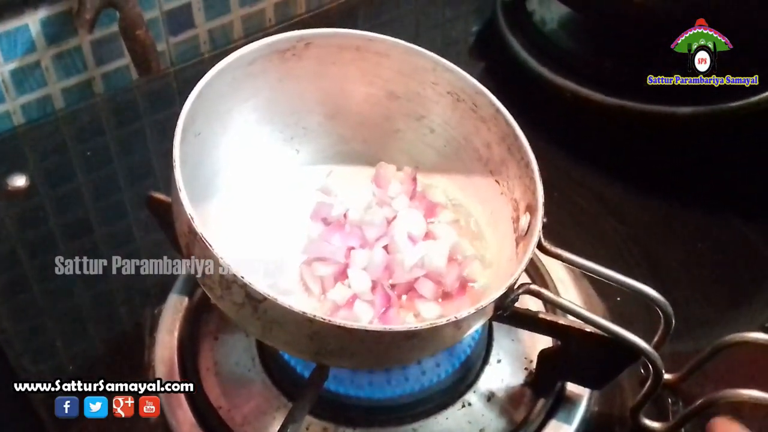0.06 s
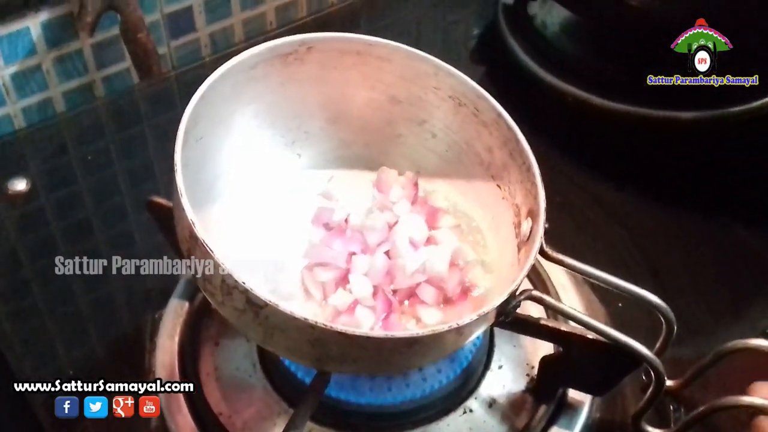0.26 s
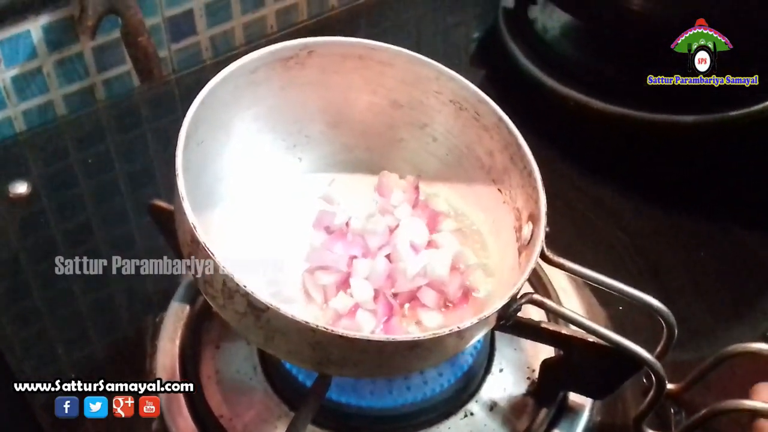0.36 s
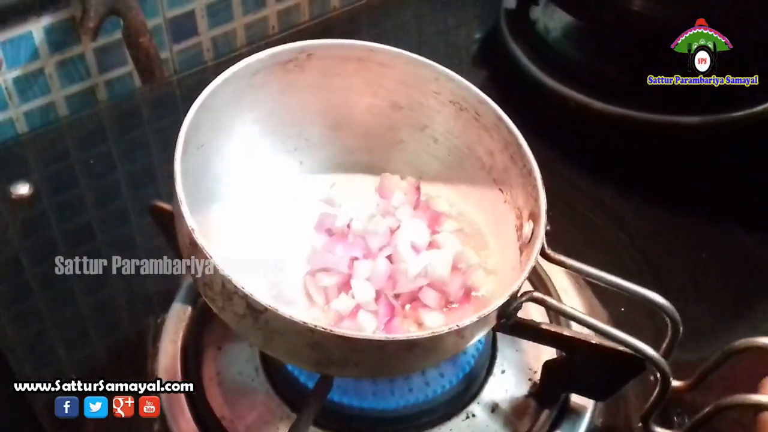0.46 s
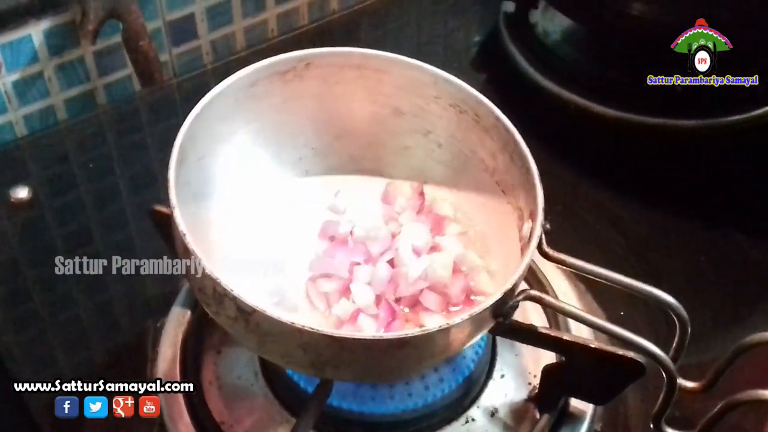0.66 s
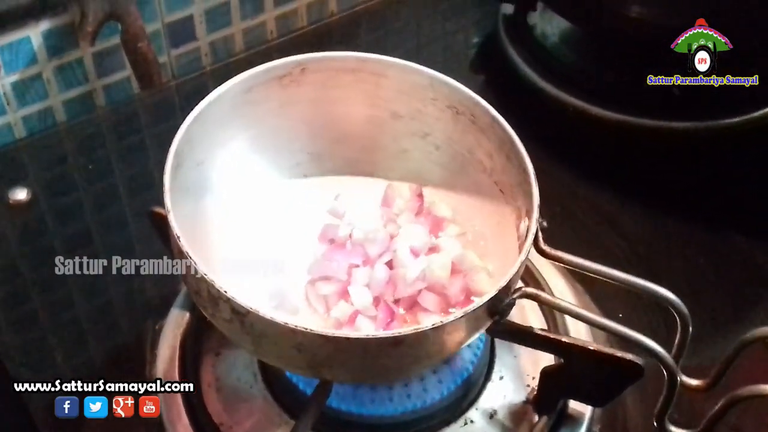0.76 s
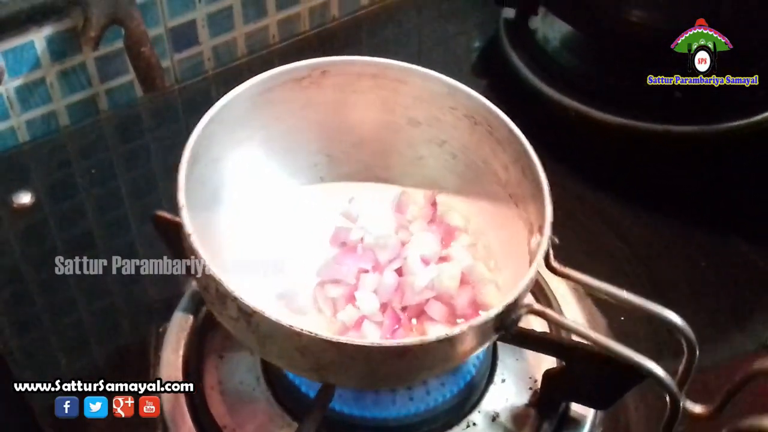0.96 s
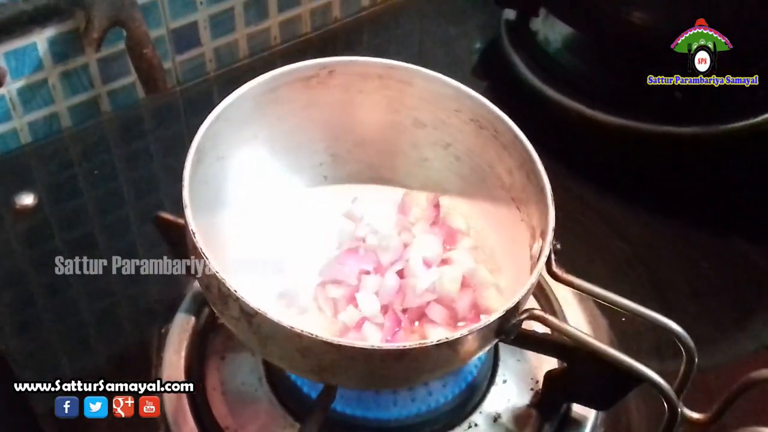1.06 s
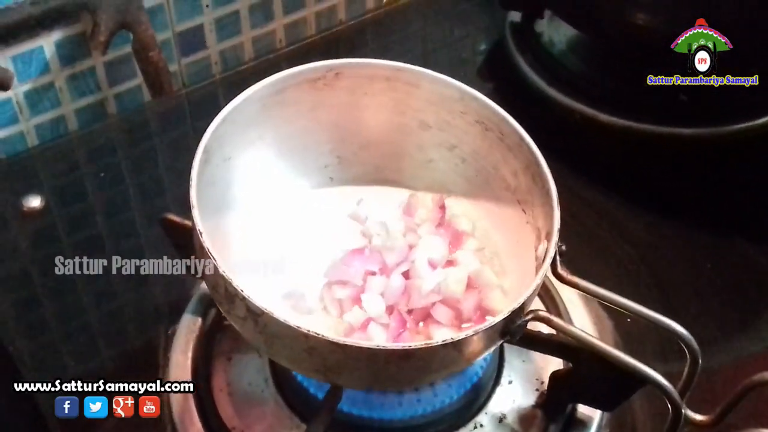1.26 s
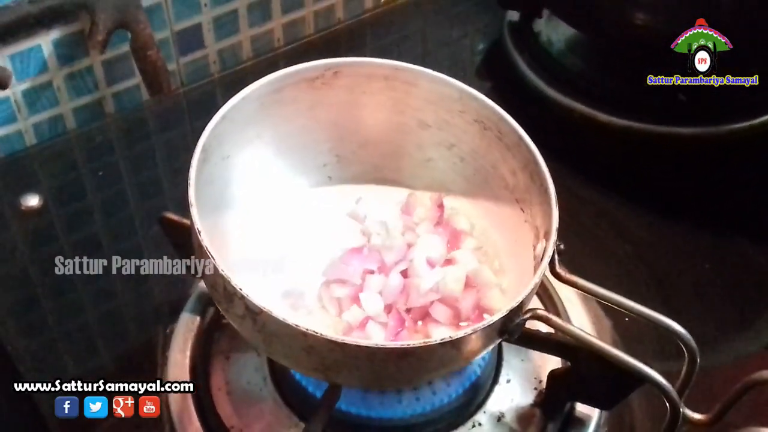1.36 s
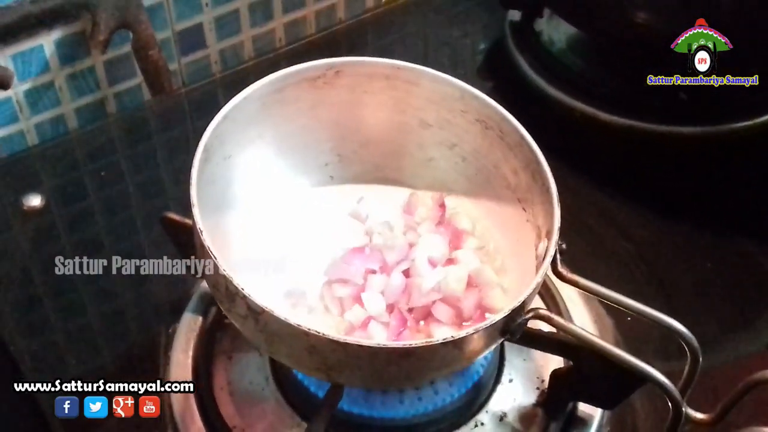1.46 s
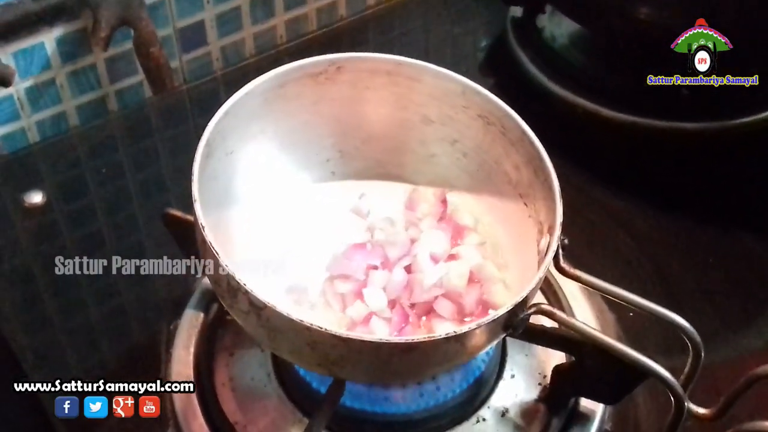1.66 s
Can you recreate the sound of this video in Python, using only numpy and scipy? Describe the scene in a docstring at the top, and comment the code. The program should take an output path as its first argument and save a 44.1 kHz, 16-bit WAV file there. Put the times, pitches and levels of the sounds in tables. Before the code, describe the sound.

Chopped shallots sizzle steadily in a deep metal pan over a gas flame, with small spits throughout; early on a metal utensil clatters down nearby, later soft bumps and a sharp pop, heard close in a small kitchen.

```python
"""In a small kitchen, chopped shallots sizzle gently in oil in a deep metal pan over a gas flame.
Tiny bubbles burst all the time as snaps with brief tones; larger ones spit, echoing between the pan's walls.
Nearby a metal utensil is put down: dense clacks and ringing modes, then narrow tones as it settles.
Later come soft bumps of dull noise and one sharp pop, a crack with a very short ring."""
import sys
import numpy as np
from scipy import signal
from scipy.fft import rfft, irfft
from scipy.io import wavfile

SR = 44100
rng = np.random.default_rng(int(sys.argv[2]) if len(sys.argv) > 2 else 0)


def unload_wav(signal):
    """Save mono or channel-first audio to the path in sys.argv[1] as 16-bit WAV at rate SR, clipped to [-1, 1]."""
    wavfile.write(
        sys.argv[1],
        SR,
        np.round(np.clip(np.atleast_2d(signal).T, -1, 1) * 32767).astype(np.int16),
    )


N = 74970
T = np.arange(N) / SR  # time in seconds


def from_db(db):
    """Decibels to gain."""
    return 10 ** (np.asarray(db) / 20)


def rms_one(x):
    """Scale to rms 1."""
    return x / np.sqrt(np.mean(x ** 2) + 1e-20)


def through(x, response):
    """Pass a sound through an impulse response."""
    return signal.fftconvolve(x, response)[:N]


def delayed(x, s):
    """Start a sound s seconds later."""
    return np.concatenate([np.zeros(int(s * SR)), x])[:N]


def dying(t60):
    """Exponential decay from 1, falling 60 dB in t60 seconds."""
    return from_db(-60 * np.minimum(T / t60, 5))


def ring(modes):
    """Sum of damped sines."""
    return sum(from_db(db) * dying(t60) * np.sin(2 * np.pi * hz * T) for hz, db, t60 in modes)


def low_cut(x, hz):
    """Small objects radiate little bass."""
    return signal.sosfilt(signal.butter(2, hz, "high", fs=SR, output="sos"), x)


def colour(points, tilt_db=0, size=4096):
    """Causal (minimum-phase) response of unit energy with a given spectrum, tilted in dB per octave."""
    hz, db = np.transpose(points)
    octave = np.log2(np.maximum(np.fft.rfftfreq(size, 1 / SR), 1))
    gain = from_db(np.interp(octave, np.log2(hz), db + tilt_db * np.log2(hz)))
    # folding the cepstrum onto positive times makes the response causal
    cepstrum = irfft(np.log(gain / gain.max()))
    cepstrum[1:size // 2] *= 2
    cepstrum[size // 2 + 1:] = 0
    response = irfft(np.exp(rfft(cepstrum)))
    return response / np.linalg.norm(response)


def echoes(delay_s, t60, db):
    """Direct sound followed by dense dying reflections, their energy in dB relative to the direct sound."""
    tail = delayed(rng.standard_normal(N) * dying(t60), delay_s)
    tail *= from_db(db) / np.linalg.norm(tail)
    tail[0] += 1
    return tail


def random_clicks(per_s, spread_db):
    """Clicks of either sign at random moments: many small, a few large."""
    signs = rng.choice([-1, 1], N)
    sizes = from_db(spread_db * np.minimum(rng.exponential(1, N), 4)) * signs
    happens = rng.random(N) < per_s / SR
    return sizes * happens


def kitchen(x, db):
    """Add the reverberation of the small room, as dense echoes."""
    return through(x, echoes(delay_s=0.006, t60=0.43, db=db))


# colour of the faint hiss that differs between the ears [f/Hz, level/dB]
SIDE_COLOUR = [(20, 5), (60, -19), (140, 0), (300, -2), (1000, 3.5), (2500, -18.5), (5000, -25.5),
               (7000, -7), (10000, -22.5), (13000, -11), (15500, -31)]
SIDE_DB = -78.5


def side_hiss():
    """Steady coloured noise for the difference between the ears."""
    return from_db(SIDE_DB) * through(rng.standard_normal(N), colour(SIDE_COLOUR))


# colour of the gas flame [f/Hz, level/dB]
FLAME_COLOUR = [(20, 8.5), (45, -9.5), (80, 3.5), (140, 5), (210, -5.5), (290, 7.5), (500, -3.5), (1000, 9),
                (3000, -19)]
FLAME_DB = -63.5


def flame():
    """The burning gas makes a steady coloured noise."""
    return from_db(FLAME_DB) * through(rng.standard_normal(N), colour(FLAME_COLOUR))


# soft bumps [t/s, level/dB, t60/s]
BUMPS = [(0.677, -59.5, 0.59), (1.093, -40.5, 0.17), (1.102, -39, 0.19), (1.124, -51, 0.077)]
# colour of a bump [f/Hz, level/dB]
BUMP_COLOUR = [(100, -18), (220, -19), (265, 3.5), (400, -1), (700, 0.5), (1100, 4), (1500, 2),
               (4000, -4.5), (8000, -47), (15000, -52)]


def bumps():
    """Something is nudged on the counter: dull, dense knocks of dying noise."""
    knocks = sum(delayed(from_db(db) * rng.standard_normal(N) * dying(t60), s) for s, db, t60 in BUMPS)
    return through(knocks, colour(BUMP_COLOUR))


# narrow tones of the utensil as it rubs
# [f/Hz, rms level at the loudest/dB, width/Hz, loudest at t/s, spread/s]
SINGING = [(745, -40, 44, .448, 0.011), (762, -52, 69.5, 0.487, 0.025), (3544, -43.5, 14, 0.412, 0.029),
           (2933, -50.5, 31, 0.44, 0.056), (613.5, -45, 82, .395, .015)]
SINGING_LOW_CUT_HZ = 350


def singing():
    """Narrow resonances swell and fade as the utensil slides to rest; a wandering phase widens each."""
    out = np.zeros(N)
    for hz, db, width_hz, s, spread_s in SINGING:
        wander = np.cumsum(rng.standard_normal(N)) * np.sqrt(2 * np.pi * width_hz / SR)
        swell = np.exp(-0.5 * ((T - s) / spread_s) ** 2)
        tone = np.sqrt(2) * np.sin(2 * np.pi * hz * T + wander)
        out += from_db(db) * swell * tone
    return low_cut(out, SINGING_LOW_CUT_HZ)


# modes of the utensil [f/Hz, level/dB, t60/s]
UTENSIL_MODES = [(562.5, -20.5, 0.23), (785, -19, .36), (895, -24, .2), (1047, -22, 0.14),
                 (1262, -18.5, 0.34), (1723, -3, 0.04), (2126, -15.5, 0.15), (2248, -1.5, 0.17),
                 (2400, -31, 0.37), (2818, -18, 0.069), (3824, -26, 0.054), (4794, -7, 0.05),
                 (5026, -11, 0.047), (5780, -14, 0.04)]
RING_ATTACK_HZ = 400  # how fast a mode takes up a blow
REST_S, REST_DAMP_DB, REST_DAMP_S = 0.33, -18, 0.0063  # lying flat damps the metal
# contacts of the utensil [t/s, clack level/dB, ring level/dB, brightness/(dB per octave)]
CONTACTS = [(0.2643, -25.5, -23, 0.5), (0.2752, -28, -36, 7.5), (0.295, -33.5, -48, 4.5),
            (0.3013, -29.5, -47, 1.5), (0.3062, -29, -43, 0.5), (0.312, -32, -30, 3),
            (0.3205, -61, -50, 14), (0.326, -41, -27, -2.5), (0.346, -35, -65, 0.5), (0.383, -41, -27, 2.5),
            (0.396, -33, -50, 2.5), (0.436, -46, -62, 8)]
# colour of a contact [f/Hz, level/dB]
CLACK_COLOUR = [(100, -35), (215, -19.5), (265, 3.5), (430, -2), (580, 3.5), (820, 2.5), (1080, 4),
                (1300, -3.5), (1450, -9), (1750, -2.5), (2300, 4.5), (2630, -8.5), (2870, 2.5), (3150, -9),
                (3800, -3), (5000, -10.5), (6300, -22), (9500, -45), (15000, -54)]
CLACK_T60_S = 0.087


def clatter():
    """Each contact gives a dense clack and tops up the energy of the metal's modes, until it lies flat."""
    clacks, rings = 0, 0
    for s, clack_db, _, tilt_db in CONTACTS:
        clack = through(rng.standard_normal(N) * dying(CLACK_T60_S), colour(CLACK_COLOUR, tilt_db))
        clacks = clacks + delayed(from_db(clack_db) * clack, s)
    attack = signal.butter(2, RING_ATTACK_HZ, fs=SR, output="sos")
    for hz, db, t60 in UTENSIL_MODES:
        fading = dying(t60) ** 2  # energy is amplitude squared
        energy = sum(delayed(from_db(2 * ring_db) * fading, s) for s, _, ring_db, _ in CONTACTS)
        swing = signal.sosfilt(attack, np.sqrt(energy) + 1e-18)
        rings = rings + from_db(db) * swing * np.sin(2 * np.pi * (hz * T + rng.random()))
    rest_damping = from_db(REST_DAMP_DB * np.clip((T - REST_S) / REST_DAMP_S, 0, 1))
    return clacks + rings * rest_damping


LANDING_DB, LANDING_T60_S, LANDING_TILT_DB = -23, 0.036, -0.5  # tilt in dB per octave


def landing():
    """The utensil's first touch adds a short, hard crack."""
    crack = through(rng.standard_normal(N) * dying(LANDING_T60_S), colour(CLACK_COLOUR, LANDING_TILT_DB))
    first_touch_s = CONTACTS[0][0]
    return delayed(from_db(LANDING_DB) * crack, first_touch_s)


PAN_ECHO_S, PAN_ECHO_T60_S = 0.001101, 0.018


def pan_echoes(db):
    """A burst bounces between the pan's walls as a quick dense tail."""
    return echoes(PAN_ECHO_S, PAN_ECHO_T60_S, db)


# short ring of the sharp pop [f/Hz, level/dB, t60/s]
POP_MODES = [(1150, -37, 0.015), (2190, -5.5, 0.025), (2400, 3, 0.015), (3960, 0, 0.017)]
POP_S, POP_RING_DB, POP_CRACK_DB, POP_ECHO_DB = 1.1121, -20.5, -16, -4
POP_TILT_DB = 7.5  # per octave
OIL_LOW_CUT_HZ = 920  # for the pop and the spits


def pop():
    """A drop of water explodes in the oil: a crack and a very short ring."""
    crack = through(pan_echoes(POP_ECHO_DB), colour(SIZZLE_COLOUR, POP_TILT_DB))
    burst = from_db(POP_CRACK_DB) * crack + from_db(POP_RING_DB) * ring(POP_MODES)
    return delayed(low_cut(burst, OIL_LOW_CUT_HZ), POP_S)


# spits of oil [t/s, snap level/dB, snap brightness/(dB per octave), tone level/dB, tone f/Hz]
SPITS = [(0.0712, -32, 6, -52, 3770), (0.145, -36, 3, -41, 3550), (0.2316, -27, 2.5, -33.5, 4230),
         (0.241, -27.5, 4.5, -31.5, 2360), (0.5318, -31.5, 1, -36.5, 2460), (0.576, -35, 5, -36, 3600),
         (0.597, -36, 3, -31, 3930), (0.628, -32, 5, -36, 3950), (0.639, -31, 4, -33.5, 3600),
         (0.647, -30, 4.5, -36, 3700), (0.724, -38, -1, -35, 4400), (0.785, -29, 0, -41, 2400),
         (0.809, -28.5, 2.5, -43, 3900), (0.8638, -37, 0, -32, 4060), (0.8723, -30.5, 3.5, -39, 3020),
         (0.905, -34, 3.5, -51, 3660), (0.933, -38, 1, -41, 3350), (0.9484, -40, 2, -36.5, 4670),
         (0.9798, -28.5, -0.5, -34, 2550), (0.983, -30.5, 1.5, -32.5, 3830), (1.1341, -29, 1, -37, 2200),
         (1.1445, -35, 6.5, -44, 3630), (1.175, -31.5, 5, -32.5, 2560), (1.2513, -28, 0, -51, 3570),
         (1.2645, -26, 4, -40, 3700), (1.295, -35, 8, -44, 4700), (1.3173, -29, 7.5, -24.5, 4460),
         (1.3264, -29, -2, -33.5, 2980), (1.4015, -27, 4, -43, 4250), (1.411, -31.5, 0.5, -32.5, 2450),
         (1.4255, -31, 3.5, -36, 2500), (1.481, -44, 8, -39.5, 7700), (1.4955, -37, 12, -50, 4000),
         (1.57, -44, 9, -39, 6450)]
SPIT_CYCLES, SPIT_ECHO_DB = 25, -2  # the tone falls 60 dB in this many cycles


def spits():
    """Larger bubbles burst: a snap and a few cycles of tone, echoing in the pan."""
    out = np.zeros(N)
    for s, snap_db, tilt_db, tone_db, hz in SPITS:
        snap = colour(SIZZLE_COLOUR, tilt_db)
        burst = ring([(hz, tone_db, SPIT_CYCLES / hz)])
        burst[:len(snap)] += from_db(snap_db) * snap / np.abs(snap).max()
        out += delayed(through(burst, pan_echoes(SPIT_ECHO_DB)), s)
    return low_cut(out, OIL_LOW_CUT_HZ)


TICKS_PER_S, TICK_DB, TICK_SPREAD_DB, TICK_TILT_DB = 61, -51.5, 3, 13  # tilt in dB per octave


def spatter():
    """Fine droplets tick dryly on the hot metal: bright random clicks."""
    ticks = random_clicks(TICKS_PER_S, TICK_SPREAD_DB)
    return from_db(TICK_DB) * through(ticks, colour(SIZZLE_COLOUR, TICK_TILT_DB))


# colour of the sizzle as it leaves the pan, shared by pop, spits and spatter [f/Hz, level/dB]
SIZZLE_COLOUR = [(250, -41), (600, -10), (950, -18.5), (1270, -3), (1480, -15.5), (1900, -8), (2370, 0),
                 (2700, -5.5), (3520, -1.5), (4700, -4.5), (6000, -15), (7600, -23), (9800, -44),
                 (11500, -26), (13500, -33.5), (15800, -38)]
# air resonances of the pan [f/Hz, level/dB, t60/s]
PAN_AIR = [(1257, -6.5, 0.14), (1676, -1, 0.43), (2304, -9.5, 0.18), (2469, 0.5, 0.072), (2922, 2, 0.064),
           (3654, -2.5, 0.094)]
PAN_AIR_DB = -44.5


def pan_voice():
    """A burst as heard from the pan: its colour and the ring of the air inside."""
    air = from_db(PAN_AIR_DB) * ring(PAN_AIR)
    air[0] += 1
    return through(air, colour(SIZZLE_COLOUR))


# vigour of the frying [t/s, level/dB]
VIGOUR = [(0, 1), (0.2, -0.5), (0.5, 0), (0.65, 1.5), (0.74, -1), (1.0, 0), (1.35, 0.5), (1.55, -1.1),
          (1.7, -1.5)]
BURSTS_PER_S, BURST_SPREAD_DB, CRACKLE_DB, HISS_DB = 2200, 3, -49.5, -52.5
BUBBLE_LOW_HZ, BUBBLE_HIGH_HZ, BUBBLE_TONE_DB = 1315, 12800, 13
BUBBLE_CYCLES = 19.4  # a bubble's tone falls 60 dB in this many cycles
BUBBLE_ECHO_DB = 1


def sizzle(count=16):
    """Bubbles of many sizes burst at random, each a snap and a brief tone with echoes, over a fine hiss."""
    crackle = 0
    sharpness = BUBBLE_CYCLES * np.pi / np.log(1000)  # Q of the resonance
    for hz in np.geomspace(BUBBLE_LOW_HZ, BUBBLE_HIGH_HZ, count):
        bursts = random_clicks(BURSTS_PER_S / count, BURST_SPREAD_DB)
        tone = signal.lfilter(*signal.iirpeak(hz, sharpness, fs=SR), bursts + 1e-18)
        bubbles = bursts + from_db(BUBBLE_TONE_DB) * tone
        crackle = crackle + through(bubbles, pan_echoes(BUBBLE_ECHO_DB))
    hiss = from_db(HISS_DB) * rng.standard_normal(N)
    fry = from_db(CRACKLE_DB) * rms_one(crackle) + hiss
    vigour = from_db(np.interp(T, *np.transpose(VIGOUR)))
    return through(fry, pan_voice()) * vigour


def scene():
    """Pan, utensil and flame in the kitchen, almost alike in both ears."""
    contacts = low_cut(bumps() + singing() + clatter() + landing(), 64)
    knocks = kitchen(contacts, db=-6)
    oil = kitchen(pop(), db=-11.5) + kitchen(spits(), db=-9.5) + spatter() + sizzle()
    mid = flame() + knocks + oil
    side = side_hiss()
    return np.array([mid + side, mid - side])


def record(dry):
    """The top is cut steeply above 15750 Hz by an elliptic low-pass."""
    return signal.sosfilt(signal.ellip(10, 0.2, 70, 15750, fs=SR, output="sos"), dry)


dry = scene()
out = record(dry)
unload_wav(out)
```